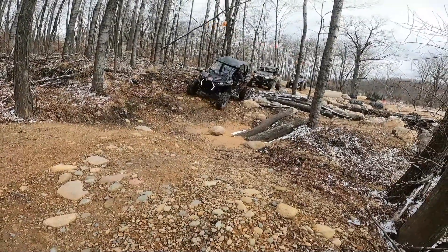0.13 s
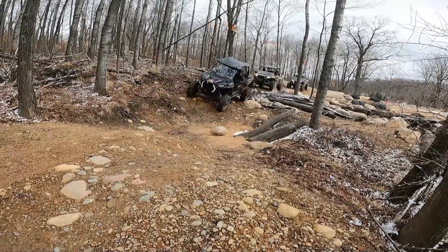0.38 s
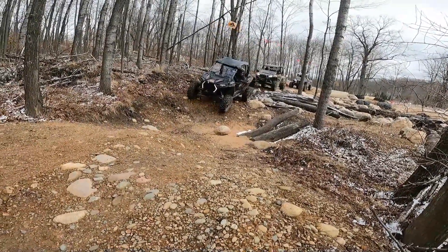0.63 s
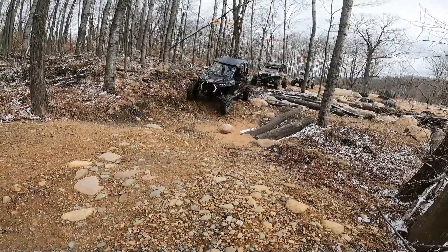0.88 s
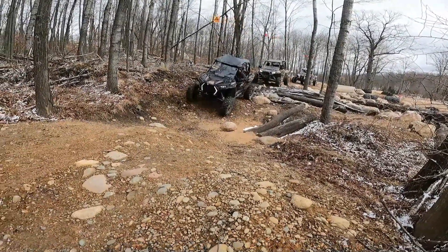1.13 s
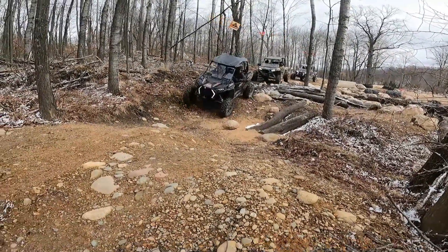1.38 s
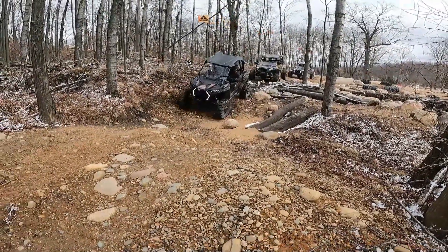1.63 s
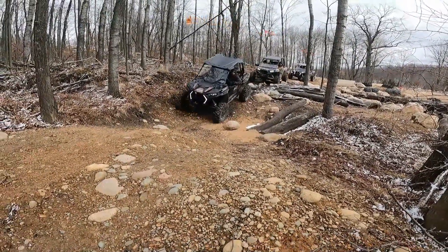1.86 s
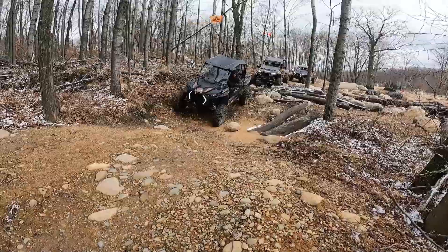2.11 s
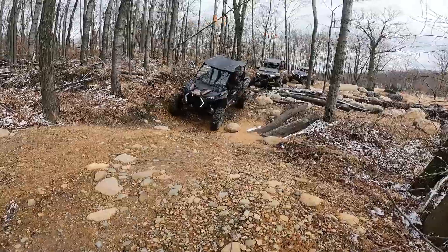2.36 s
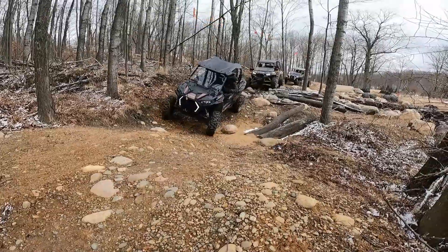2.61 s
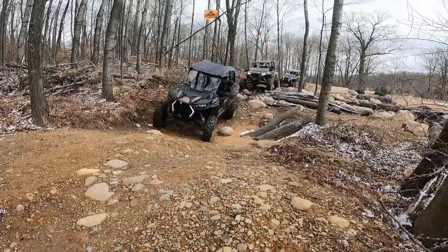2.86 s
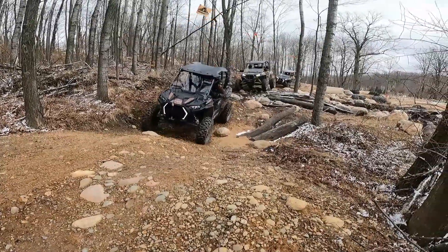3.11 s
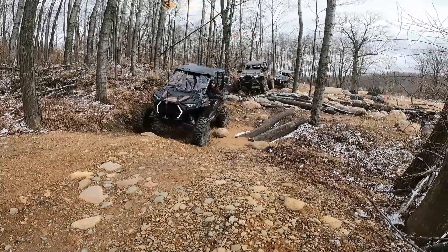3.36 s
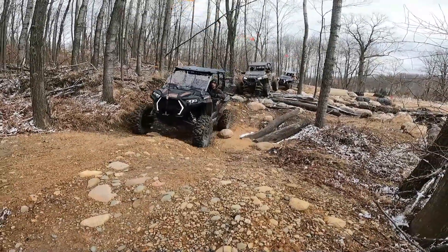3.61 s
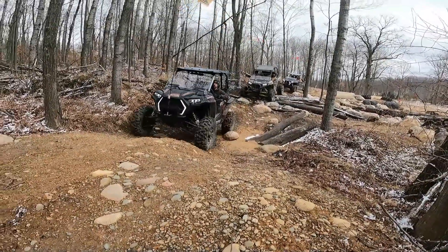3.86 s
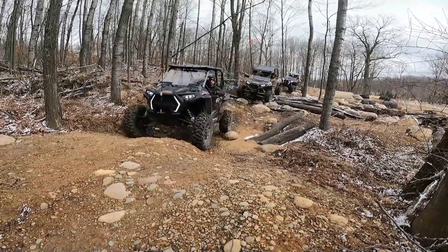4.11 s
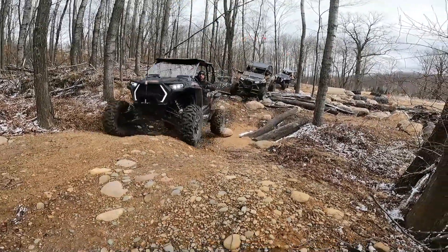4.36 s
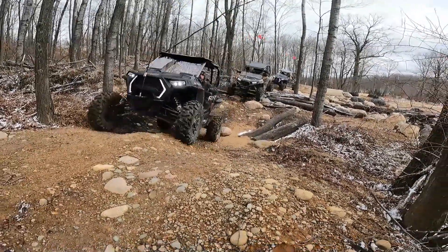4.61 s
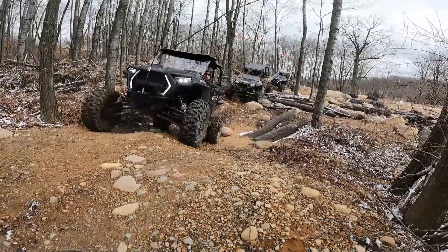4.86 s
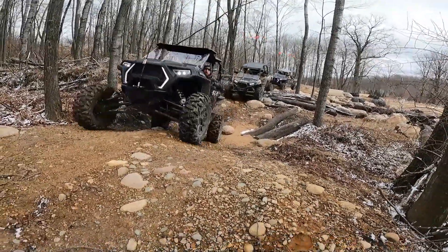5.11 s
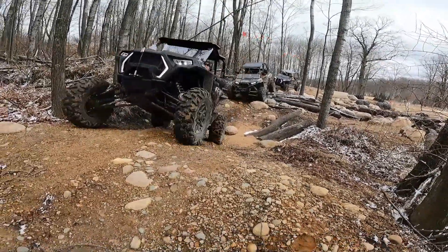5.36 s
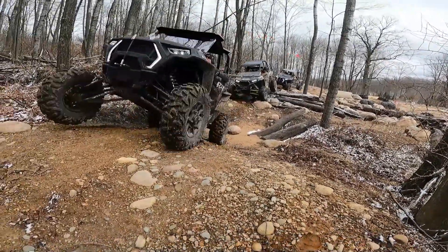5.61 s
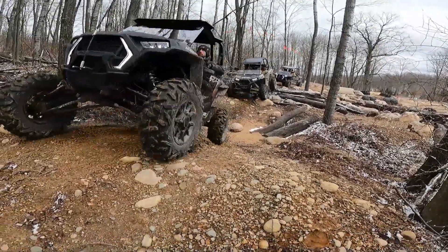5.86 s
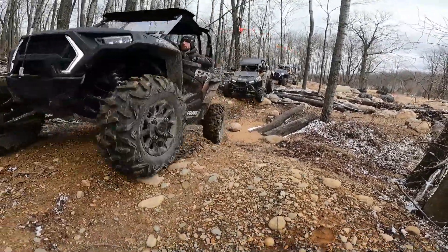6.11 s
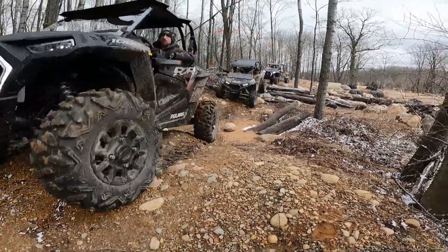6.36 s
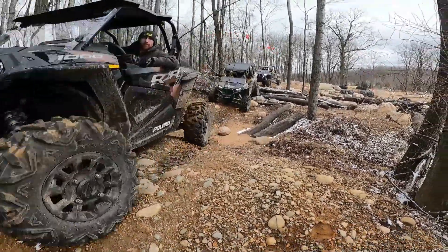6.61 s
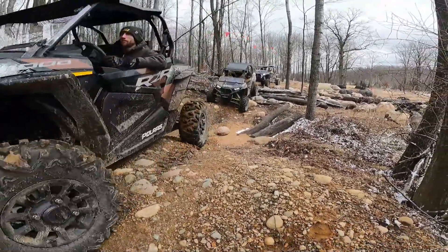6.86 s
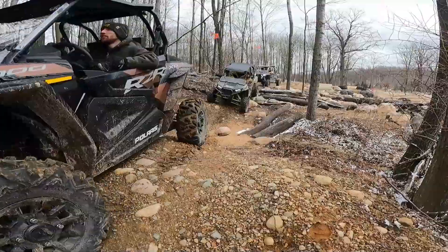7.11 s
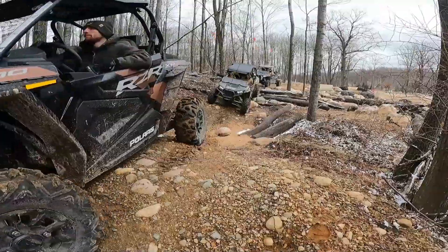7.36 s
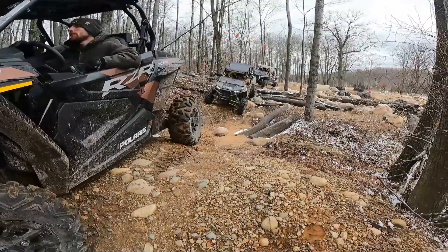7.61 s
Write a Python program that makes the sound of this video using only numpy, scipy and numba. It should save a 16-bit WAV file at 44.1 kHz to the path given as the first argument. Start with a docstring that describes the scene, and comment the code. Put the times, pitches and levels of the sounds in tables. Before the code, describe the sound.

A deep twin-cylinder off-road buggy engine, uneven and boomy, runs outdoors in bare woodland. Low wind bumps the microphone at the start as the revs sink to a lumpy chug until about 1.6 s, with a few dull knocks and a very faint squeal near 0.4 s. At 1.7 s the throttle picks up into a steadier burble with knocks, rising slowly through 3.5 s, where another faint squeal hides. A surge at 4.2 s growls higher, then eases. After a dip at 5.1 s comes the hardest rev, 5.2 to 5.7 s, raspy with roaring exhaust and bright clatter. The revs fall away from 5.8 s; stones knock and grit ticks in a cluster around 6.3 to 6.8 s. A slow close idle thuds around 7 s, then a sharp knock and short throttle blip at 7.5 s. Another engine idles faintly behind; dull echoes are short.

```python
"""A twin-cylinder off-road buggy crawls over a stony track in a bare wood and passes close to the microphone.
Two uneven firings a cycle ring the exhaust, pipes and body; turbulent gas roars and valve gear clatters.
Stones crunch and knock under the tyres as decaying grit through resonances, with a few echoes from the wood.
Another twin idles farther back, narrow noise squeals faintly, and low noise is a little wind at the microphone."""
import sys
import numpy as np
from scipy import signal
from scipy.fft import rfft, irfft
from scipy.io import wavfile
from scipy.ndimage import uniform_filter1d
from numba import njit

SR = 44100
rng = np.random.default_rng(int(sys.argv[2]) if len(sys.argv) > 2 else 0)


def persist_wave(psi):
    """Save psi, clipped to +-1, as 16-bit WAV."""
    counts = np.round(np.clip(psi, -1, 1) * 32767).astype(np.int16)
    wavfile.write(sys.argv[1], SR, np.atleast_2d(counts).T)


def amplitude_ratio(level_db):
    """Convert a level in decibels to the matching linear amplitude (field) ratio."""
    exponent = np.asarray(level_db, float) / 20
    return 10 ** exponent


N = 340893


def rms_one(x):
    """Scales a signal to an rms of one."""
    return x / np.sqrt(np.mean(x ** 2) + 1e-20)


def in_time(rows):
    """Draws straight lines between the rows of a table whose first column is seconds."""
    seconds, *columns = np.transpose(rows)
    return [np.interp(np.arange(N) / SR, seconds, column) for column in columns]


def at_hz(points, hz):
    """Reads a table of (Hz, value) on a logarithmic frequency axis."""
    point_hz, values = np.array(points).T
    return np.interp(np.log(hz), np.log(point_hz), values)


def even(x, seconds):
    """Brings the running rms to one."""
    return x / np.sqrt(uniform_filter1d(x ** 2, int(seconds * SR)) + 1e-12)


def drift(rate_hz):
    """Slow chance with spread 1, drawn every 40 samples."""
    r = np.exp(-80 * np.pi * rate_hz / SR)
    noise = rng.standard_normal(N // 40 + 2002)
    slow = signal.lfilter([1], [1, -2 * r, r * r], noise)[2000:]
    return np.interp(np.arange(N) / 40, np.arange(len(slow)), rms_one(slow))


def resonate(x, modes):
    """Parallel resonances (Hz, width Hz, dB) of alternating sign."""
    out = 0
    for k, (hz, width, db) in enumerate(modes):
        r = np.exp(-np.pi * width / SR)
        rise = [(1 - r * r) / 2, 0, (r * r - 1) / 2]
        ring = [1, -2 * r * np.cos(2 * np.pi * hz / SR), r * r]
        out = out + (-1) ** k * amplitude_ratio(db) * signal.lfilter(rise, ring, x + 1e-18)
    return out


@njit
def gliding(x, hz, width, sr):
    """A resonance whose centre and width move; an impulse starts a sine."""
    out, r = np.zeros(len(x)), np.exp(-np.pi * width / sr)
    for i in range(2, len(x)):
        w = 2 * np.pi * hz[i] / sr
        out[i] = x[i - 1] * w + 2 * r[i] * np.cos(w) * out[i - 1] - r[i] * r[i] * out[i - 2]
    return out


def cut(x, hz, kind, order=2):
    """Butterworth filter."""
    return signal.sosfilt(signal.butter(order, hz, kind, fs=SR, output="sos"), x)


# Likeness of left and right in broad noise: pitch_hz, likeness (0-1)
LIKENESS = [(60, 0.99), (180, 0.98), (510, 1), (1500, 0.89), (4400, 0.79), (12900, 0.6)]


def banded(spectrum, source, patchy_db):
    """Half-octave bands of a (2, 2, N) source, each with its own level, flicker and stereo likeness; rms 1."""
    out, together = 0, drift(14)
    lowest, highest = spectrum[0][0], spectrum[-1][0]
    edges = lowest * 2 ** np.arange(0, np.log2(highest / lowest), .5)
    for k, (low, high) in enumerate(zip(edges, edges[1:])):
        mid, side = cut(source[k % 2], [low, high], "band")
        hz = np.sqrt(low * high)
        alike = np.clip(at_hz(LIKENESS, hz), 0, 1)
        gain = amplitude_ratio(at_hz(spectrum, hz) + patchy_db * (0.46 * together + drift(6.0)))
        out = out + gain * (np.sqrt(1 + alike) * mid + np.sqrt(1 - alike) * side * [[1], [-1]])
    return rms_one(out)


# Engine speed of the near buggy: time_s, speed_hz (four-stroke cycles per second)
SPEED = [(0.0, 16.95), (0.17, 15.24), (0.34, 12.75), (0.5, 12.46), (0.67, 11.74), (0.9, 11.24),
         (1.15, 12.29), (1.36, 11.48), (1.57, 10.73), (1.7, 14.29), (1.83, 18.29), (2.0, 19.01),
         (2.24, 17.52), (2.4, 18.25), (2.75, 18.62), (3.1, 20.5), (3.47, 22.54), (3.92, 21.14),
         (4.0, 21.42), (4.2, 27.6), (4.36, 29.3), (4.44, 27.5), (4.6, 25.24), (4.8, 23.7), (4.95, 21.76),
         (5.13, 17.52), (5.2, 20.0), (5.4, 30.32), (5.5, 32.06), (5.6, 31.98), (5.78, 25.12), (5.95, 22.42),
         (6.2, 19.18), (6.5, 16.17), (6.75, 12.75), (7.0, 11.26), (7.15, 10.82), (7.3, 10.95),
         (7.38, 13.69), (7.52, 18.44), (7.73, 16.6)]
CRAWL_HZ = 18  # speed at which the "at crawl" settings below hold


def octaves():
    """Engine speed in octaves above a crawl."""
    return np.log2(in_time(SPEED)[0] / CRAWL_HZ)


IDLE_MISFIRE, SMOOTH_MISFIRE = .12, .025  # unevenness of the firings
SMOOTH_FROM_HZ, SMOOTH_OVER_HZ = 13, 7  # evens out from this speed, over this range


def misfire():
    """Running is uneven at idle and evens out as the speed rises."""
    smooth_hz = [SMOOTH_FROM_HZ, SMOOTH_FROM_HZ + SMOOTH_OVER_HZ]
    return np.interp(in_time(SPEED)[0], smooth_hz, [IDLE_MISFIRE, SMOOTH_MISFIRE])


SECOND_FIRING = .242  # share of the cycle between the two firings


def firings(cycle, misfire, second_db, spread_db, jitter_s):
    """Two impulses a cycle, about a quarter cycle apart; weak running scatters their strength and timing."""
    out, turns = np.zeros(N), np.arange(np.ceil(cycle[0]), cycle[-1] - 1)
    for late, db in ((0, 0), (SECOND_FIRING, second_db)):
        chance = rng.standard_normal((len(turns), 2))
        at = np.searchsorted(cycle, turns + late)
        at = np.clip(at + (jitter_s * SR * misfire[at] * chance[:, 0]).astype(int), 0, N - 1)
        out[at] -= amplitude_ratio(db + spread_db * misfire[at] * chance[:, 1])
    return out


# Throttle and distance, also followed by roar, pull, pipe and clatter:
# time_s, boom_level_db, roar_level_db, clatter_level_db
DRIVE = [(0, -15, -40, -49.5), (.4, -22, -44.5, -54.5), (.69, -17, -38, -51), (.9, -23.5, -44.5, -55.5),
         (1.6, -18, -41, -52), (1.86, -16.5, -35.5, -50.5), (2.15, -19, -41.5, -50),
         (2.8, -16.5, -38, -48.5), (3.3, -18, -43, -51.5), (3.6, -15.5, -39.5, -47.5),
         (3.97, -14.5, -39, -47.5), (4.25, -13, -33, -42), (4.48, -16.5, -40, -46), (4.97, -16, -36, -47.5),
         (5.1, -22, -42, -46.5), (5.2, -16, -34.5, -47.5), (5.27, -12.5, -29.5, -42.5),
         (5.35, -14.5, -26.5, -37), (5.42, -16.5, -26, -37.5), (5.52, -21, -27, -38),
         (5.62, -19, -33.5, -39), (5.72, -18, -37, -40), (5.85, -15, -36, -43), (6.4, -19, -38.5, -44),
         (6.7, -16, -40.5, -48), (7.05, -19, -40, -49.5), (7.3, -18.5, -42.5, -48), (7.5, -13, -35.5, -44),
         (7.73, -17, -39.5, -46)]
# Muffler chambers before gas heat and speed move them: pitch_hz, width_hz, level_db
MUFFLER = [(80.1, 32, -3), (110.3, 42.5, 12), (136.2, 18.2, -9)]
# The boom's pitch shifts with gas heat and bearing: time_s, pitch_factor
BOOM_PITCH = [(0, 1.15), (.4, 0.982), (1.0, 1.002), (1.6, 0.976), (1.9, 1.016), (2.5, 1), (3.2, 0.986),
              (3.9, 1.005), (4.12, 1.15), (4.35, 1.15), (4.6, 1.13), (4.8, 1.103), (5.1, 1.04),
              (5.27, 0.99), (5.4, 1.15), (5.6, 1.26), (5.75, 1.16), (5.95, 1.06), (6.3, 1.02), (6.8, 1.015),
              (7.2, .99), (7.45, 1.04), (7.73, .98)]
DAMPING_AT_CRAWL, DAMPING_PER_OCTAVE = 0.95, 0.21  # factor on the muffler widths
WEAK_ORDER, WEAK_SHARE = 3, 0.5  # a multiple of the cycle that is faint at any speed, share of it missing


def exhaust(pulses, cycle):
    """The firings ring the muffler chambers, twice through; fast gas damps them."""
    level_db, factor = in_time(DRIVE)[0], in_time(BOOM_PITCH)[0]
    damping = np.clip(DAMPING_AT_CRAWL + DAMPING_PER_OCTAVE * octaves(), .5, 2)
    breath = amplitude_ratio(-57) * rng.standard_normal(N)
    push = cut(cut(pulses, 300, "low") + breath, 74, "high", order=4)
    boom = 0
    for hz, width, db in MUFFLER:
        once = gliding(push, hz * factor, width * damping, SR)
        boom = boom + amplitude_ratio(db) * width / hz * gliding(once, hz * factor, width * damping, SR)
    # on an axis of engine cycles, one order is one fixed pitch
    turns = np.arange(cycle[0], cycle[-1], 1 / 512)
    peak = signal.iirpeak(WEAK_ORDER, 5, fs=512)
    weak = signal.lfilter(*peak, np.interp(turns, cycle, boom))
    boom = boom - WEAK_SHARE * np.interp(cycle, turns, weak)
    return amplitude_ratio(level_db) * even(boom, 0.26)


HEAVE_DB, HEAVE_DB_PER_OCTAVE = -42.5, 15.5  # rms at a crawl, gain with speed


def heave(cycle):
    """The slow heave of the whole cycle is one sine a cycle that gains with speed."""
    level_db = HEAVE_DB + HEAVE_DB_PER_OCTAVE * octaves()
    return amplitude_ratio(level_db) * np.sqrt(2) * np.cos(2 * np.pi * (cycle - .3))


GUST_AT_CRAWL, GUST_PER_OCTAVE = .33, .3  # share of the turbulence that comes in puffs


def puffs(pulses):
    """The gas flow out of the tailpipe rises at each firing and dies, more so at speed; mean about 1."""
    fade = amplitude_ratio(-60 / (.09 * SR))  # 60 dB in 0.09 s
    flow = np.abs(signal.lfilter([1], [1, -fade], cut(np.abs(pulses), 50, "low")))
    share = np.clip(GUST_AT_CRAWL + GUST_PER_OCTAVE * octaves(), .05, .7)
    return 1 - share + share * flow / (uniform_filter1d(flow, int(.2 * SR)) + 1e-9)


# Spectrum of the turbulent gas: pitch_hz, level_db (relative, per Hz on noise bands)
ROAR = [(120, -32), (200, -1.5), (302, -8.5), (496, -9), (798, -16.5), (1060, -26), (1280, -18.5),
        (2500, -37), (3250, -69), (5500, -120)]
BARK_DB, BARK_DB_PER_OCTAVE = -7, 6  # the bark against the turbulence at a crawl, gain with speed


def roar(pulses):
    """Each firing barks through the tailpipe and lets out a puff of turbulent gas."""
    bark = rms_one(cut(even(pulses, 0.21), [170, 560], "band"))
    gas = banded(ROAR, rng.standard_normal((2, 2, N)) * puffs(pulses), patchy_db=1.6)
    both = rms_one(gas + amplitude_ratio(BARK_DB + BARK_DB_PER_OCTAVE * octaves()) * bark)
    return amplitude_ratio(in_time(DRIVE)[1]) * both


# Clean upper orders under a hard pull: order (multiple of the cycle), level_db (relative)
PULL_ORDERS = [(5, 15.5), (6, -0.5), (7, -8), (8, 2.5), (9, 3.5), (10, -9), (11, -5.5), (12, 2), (13, 1.5),
               (14, -8), (15, -11), (16, -10), (17, -9.5), (18, -12), (20, -9.5), (21, -12)]
PULL_PEAK = 0.3964  # share of the cycle around which the orders add up
PULL_DB, PULL_FOLLOWS = -47.5, 0.86  # level at mean roar, share of the roar's swing
PULL_FULL_HZ, PULL_DB_PER_HZ = 17.4, -0.5  # below this speed the level changes by this slope


def pull(cycle):
    """With the throttle open the firings are alike and single orders stand out, wavering a little."""
    orders = 0
    for order, db in PULL_ORDERS:
        level = amplitude_ratio(db + 1.5 * drift(5))
        turn = order * (cycle - PULL_PEAK) + .1 * rng.standard_normal()
        orders = orders + level * np.sin(2 * np.pi * turn)
    roar_db = in_time(DRIVE)[1]
    below_hz = np.maximum(PULL_FULL_HZ - in_time(SPEED)[0], 0)
    level_db = PULL_DB + PULL_FOLLOWS * (roar_db - roar_db.mean()) - PULL_DB_PER_HZ * below_hz
    return amplitude_ratio(level_db) * orders


# Pipe and body resonances: pitch_hz, width_hz, turbulence_share (0-1)
PIPE = [(343, 46, .05), (150, 48, .03), (192, 36, .03), (258, 70, .08), (505, 50, .5), (660, 110, .6),
        (1020, 220, .75), (1560, 100, .9), (2100, 450, .9)]
# Their levels before the swell: level_db (at mean roar and a crawl), share of the roar's swing,
# slope_db (per octave of speed)
PIPE_DB = [(-47, 0.43, 2), (-33, 0.6, 0), (-36, 0.3, 5.5), (-46, 0.88, 1), (-55, 0.9, -5), (-57, 0.22, 8.5),
           (-49.5, .5, 1.5), (-60, 0.29, 2.5), (-60.5, 1, 6)]
# Groups of resonances swell and sink as the vehicle turns: time_s, drone_db (about 350 Hz),
# whine_db (about 500 Hz), hum_db (under 200 Hz), rasp_db
SWELL = [(0, -3.5, -12.5, 3.5, 1.5), (.6, -14.5, 0.5, -7, -1.5), (1.299, -4, 10, -5, 0.5),
         (1.6, -12.5, -1, -5, -1.5), (1.8, 6, 3, 5, -2.5), (2.15, -6, 6.5, -5, -3.5),
         (2.45, -10.5, 12, 5.5, 2), (3.1, -2.5, -11.5, -2, -3), (3.499, 5.5, -17, -2.5, -2.5),
         (4.071, 12, -14, -3.5, 5.5), (4.35, 6.5, -10, 0.5, 10.5), (4.55, -1, -3, -6.5, -0.5),
         (5.04, -2.5, -5, -4, -1), (5.25, 4.5, -3, -6, 5), (5.45, 4, -5, -1.5, 3.5),
         (6.0, 4, 9.5, 0.5, 0.5), (6.45, 6.5, -1.5, 3, 1.5), (6.9, -2, 7, -13.5, -1),
         (7.3, -6, 4.5, -3.5, 4), (7.5, 13.5, 3.5, 4.5, 7), (7.73, 3.5, 7.5, 5.5, -1.5)]
# Which swell moves which resonance: resonance index -> swell column index after time_s
SWELL_OF = {0: 0, 4: 1, 1: 2, 2: 2, 3: 3, 5: 3, 6: 3}


def pipe(pulses):
    """The firings and some turbulence ring each resonance, steeply (twice through)."""
    out, steady, roar_db = 0, even(pulses, 0.23), in_time(DRIVE)[1]
    swell_db, gusty = in_time(SWELL), rms_one(puffs(pulses))
    for k, ((hz, width, share), (db, follows, octave_db)) in enumerate(zip(PIPE, PIPE_DB)):
        level_db = db + follows * (roar_db - roar_db.mean()) + octave_db * octaves()
        if k in SWELL_OF:
            level_db = level_db + swell_db[SWELL_OF[k]]
        drive = np.sqrt(1 - share) * steady + np.sqrt(share) * gusty * rng.standard_normal(N)
        mode = [(hz, width, 0)]
        out = out + amplitude_ratio(level_db) * rms_one(resonate(resonate(drive, mode), mode))
    return out


# Spectrum of valve gear and gravel: pitch_hz, level_db (relative)
CLATTER = [(710, -31), (1200, -3), (1300, 4), (1910, -3.5), (2560, -6), (5440, -12.5), (9000, -27),
           (11900, -51), (12800, -61), (13300, -68)]


def clatter(cycle):
    """Valve gear hisses in time with the cycle; gravel adds uneven grains."""
    sizes = amplitude_ratio(4.9 * np.minimum(rng.exponential(1, (2, N)), 5)) * rng.choice([-1, 1], (2, N))
    grains_per_s = 900 * amplitude_ratio(5 * drift(8))
    grains = rms_one(sizes * (rng.random((2, N)) < grains_per_s / SR))
    hiss = rng.standard_normal((2, 2, N)) * (1 + 0.032 * np.cos(2 * np.pi * (cycle - .3)))
    return amplitude_ratio(in_time(DRIVE)[2]) * banded(CLATTER, hiss + 0.055 * grains, patchy_db=1.32)


IDLE_HZ = 11.9  # mean cycles per second of the twin behind
BEHIND_DB, BEHIND_DB_PER_OCTAVE = -28, -6  # covered as the near one revs above a crawl


def idling_behind():
    """Another twin ticks over unevenly farther back, ringing three low resonances."""
    cycle = np.cumsum(IDLE_HZ * (1 + 0.02005 * drift(0.603))) / SR
    pulses = firings(cycle, np.ones(N), second_db=-1.5, spread_db=2.0, jitter_s=0.00091)
    modes = [(54.0, 18.0, -8.5), (108.4, 15.0, 3.5), (143.9, 27.0, -2.0)]
    level_db = BEHIND_DB + BEHIND_DB_PER_OCTAVE * np.maximum(octaves(), 0)
    return amplitude_ratio(level_db) * rms_one(resonate(cut(pulses, 220, "low"), modes))


# Wind at the microphone: time_s, level_db
WIND = [(0, -21), (.45, -42.5), (.9, -30.5), (1.8, -34), (2.2, -34.5), (2.6, -50.5), (3.9, -46.5),
        (4.7, -48), (5.3, -32.5), (6.1, -32.5), (6.6, -33.5), (7.1, -32), (7.4, -39), (7.73, -49.5)]


def wind():
    """Wind is low noise, nearly the same left and right."""
    middle_and_side = rng.standard_normal((2, N)) * [[1], [.06]]
    mid, side = amplitude_ratio(in_time(WIND)[0]) * rms_one(cut(middle_and_side, [28, 52], "band"))
    return mid + side * [[1], [-1]]


# Stones and chassis knocks: start_s, dull_level_db, bright_level_db (drive, each relative), t60_s
KNOCKS = [(0.08, -24, -42, 0.049), (0.214, -40, -46, 0.1), (0.24, -42.5, -46, 0.078),
          (0.515, -34, -61, 0.1), (0.596, -28.5, -60, 0.16), (0.635, -34.5, -49.5, 0.074),
          (1.408, -33, -46, 0.039), (1.789, -34, -54.5, 0.055), (1.858, -19, -50, 0.035),
          (1.947, -27, -44.5, 0.065), (2.558, -23, -50, 0.041), (2.948, -39.5, -42.5, 0.053),
          (3.012, -31.5, -60.5, 0.081), (4.135, -30.5, -43, 0.079), (4.854, -24.5, -65, 0.049),
          (5.272, -19.5, -47, 0.044), (5.825, -21, -42.5, 0.074), (6.288, -20, -40.5, 0.07),
          (6.306, -20.5, -44.5, 0.097), (6.33, -27, -45, 0.058), (6.504, -38, -42, 0.047),
          (6.566, -28.5, -47, 0.06), (6.634, -25.5, -51, 0.058), (6.717, -26.5, -52.5, 0.1),
          (6.76, -28.5, -54, .05), (7.023, -37, -53, 0.068), (7.122, -29.5, -43, 0.048),
          (7.482, -33, -43.5, 0.036), (7.511, -14.5, -32, 0.085)]
# What the dull part of a knock rings with: pitch_hz, width_hz, level_db
KNOCK_DULL = [(540, 230, 6.5), (980, 400, 4), (1520, 140, -8.5)]
# What the bright part rings with: pitch_hz, width_hz, level_db
KNOCK_BRIGHT = [(1770, 550, 6.5), (2960, 1300, 3.5), (5220, 1300, -1), (7950, 2500, -23.5)]


def knocks():
    """A sharp tick and a dying scatter of grit excite a dull set of resonances, more grit a bright set."""
    dull, bright = np.zeros(N), np.zeros(N)
    age = np.arange(int(.15 * SR)) / SR
    for start_s, dull_db, bright_db, t60 in KNOCKS:
        at = round(start_s * SR)
        shape = (amplitude_ratio(-60 * age / max(t60, .01)) * np.minimum(age / .002, 1))[:N - at]
        end = at + len(shape)
        grit = rng.standard_normal((2, len(age)))[:, :len(shape)] * shape
        grit[0, 20] += 7.0  # the tick
        onset = np.minimum(age / 0.0044, 1)[:len(shape)]
        dull[at:end] += amplitude_ratio(dull_db + 3.5) * grit[0]
        bright[at:end] += amplitude_ratio(bright_db + 12.5) * grit[1] * onset
    return resonate(dull, KNOCK_DULL) + resonate(bright, KNOCK_BRIGHT)


def woods(x):
    """A few dull echoes off ground and trunks, other ones each side."""
    dull = cut(x, [420, 3500], "band")
    lags = (rng.uniform(0.0044, .07, (2, 6)) * SR).astype(int)
    sides = []
    for side in lags:
        # later echoes are weaker, by 180 dB per second
        sides.append(sum(np.pad(dull, (lag, 0))[:N] * amplitude_ratio(-180 * lag / SR) for lag in side))
    return np.array(sides)


# A faint squeal, perhaps a brake: start_s, length_s, pitch_hz, level_db (at its fullest)
SQUEALS = [(.3, 0.36, 763, -54.5), (3.4, 0.65, 833, -54)]


def squeals():
    """Narrow noise on a pitch and its octave swells and fades."""
    out, t = 0, np.arange(N) / SR
    for start_s, length_s, hz, db in SQUEALS:
        modes = [(hz, 55, -3), (2 * hz, 130, -3.5)]
        tone = rms_one(resonate(resonate(rng.standard_normal(N), modes), modes))
        swell = np.sin(np.pi * np.clip((t - start_s) / length_s, 0, 1))
        out = out + amplitude_ratio(db) * swell * tone
    return out


# Grit flicked off the tyres: start_s, level_db (before the band filter and the side's chance)
TICKS = [(1.4606, -49), (2.9496, -39), (4.135, -36), (6.2898, -43), (6.325, -44), (6.336, -42),
         (6.4192, -47), (6.504, -45), (6.7365, -47), (6.7472, -45), (7.225, -49)]


def ticks():
    """Tiny bright clicks of quickly dying noise, each leaning to its own side."""
    out, age = np.zeros((2, N)), np.arange(int(.025 * SR)) / SR
    for start_s, db in TICKS:
        at = round(start_s * SR)
        shape = amplitude_ratio(db - 60 * age / 0.023) * np.minimum(age / 0.00075, 1)
        grit = rng.standard_normal(len(age)) * shape
        out[:, at:at + len(age)] += grit * amplitude_ratio(rng.normal(0, 3.5) * np.array([[1], [-1]]))
    return cut(out, [4500, 12500], "band")


START_CYCLE = .6  # where in its cycle the engine starts
BODY_LAG_S = .011  # pipes and body answer a little after the firing


def scene():
    """The buggy, its knocks with their echoes, the twin behind and the wind, summed in stereo."""
    cycle = START_CYCLE + np.cumsum(in_time(SPEED)[0]) / SR
    pulses = firings(cycle, misfire(), second_db=-1.5, spread_db=17.0, jitter_s=0.003)
    late = np.pad(pulses, (int(BODY_LAG_S * SR), 0))[:N]
    hits, rings = knocks(), pipe(late)
    engine = exhaust(pulses, cycle) + heave(cycle) + pull(cycle) + rings
    middle = engine + idling_behind() + hits + squeals()
    echoes = amplitude_ratio(-13.0) * woods(hits + rings)
    return middle + echoes + roar(late) + clatter(cycle) + ticks() + wind()


def squeeze(x, knee_db, share, attack_s, release_db_per_s):
    """Fast gain control: a share of whatever rises above the knee is taken away."""
    level_db = 20 * np.log10(np.abs(x).max(axis=0) + 1e-6)
    fall_db = release_db_per_s * np.arange(N) / SR
    held_db = np.maximum.accumulate(level_db + fall_db) - fall_db
    over_db = np.maximum(held_db - knee_db, 0)
    r = np.exp(-1 / (attack_s * SR))
    return x * amplitude_ratio(-share * signal.lfilter([1 - r], [1, -r], over_db))


def low_pass(x):
    """Removes everything above the highest recorded frequency."""
    return signal.sosfilt(signal.butter(12, 13490, fs=SR, output="sos"), x)


# Tilt of the microphone housing: pitch_hz, lean_db (left minus right)
LEAN = [(60, 0.5), (180, 0.5), (510, -2), (1500, -1.5), (4400, 0), (12900, 1)]


def record(dry):
    """The housing tilts the middle right, the left port hears lows a sample late, gain control evens throbs."""
    hz = np.maximum(np.fft.rfftfreq(N, 1 / SR), 20)
    lean = amplitude_ratio(at_hz(LEAN, hz) / 2 * [[1], [-1]])
    lag_samples = 1 / (1 + (hz / 6500) ** 4) * [[1], [0]]
    ports = irfft(rfft(dry) * lean * np.exp(-2j * np.pi * hz / SR * lag_samples), N)
    heard = cut(ports, 18, "high")
    heard = squeeze(heard, knee_db=-14.5, share=0.25, attack_s=0.0061, release_db_per_s=125.0)
    mix = 0.72 * np.tanh(heard / 0.65)  # soft overload
    return low_pass(mix)


dry = scene()
out = record(dry)
persist_wave(out)
```